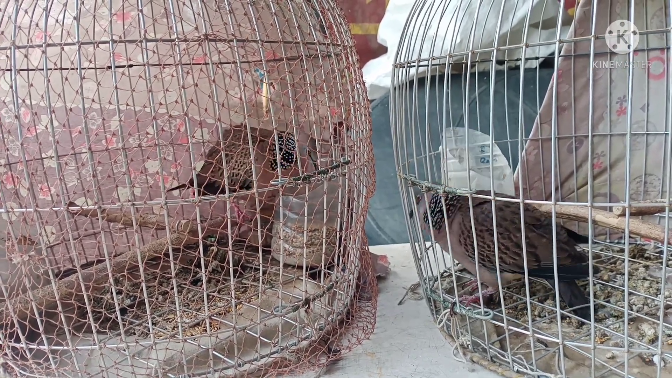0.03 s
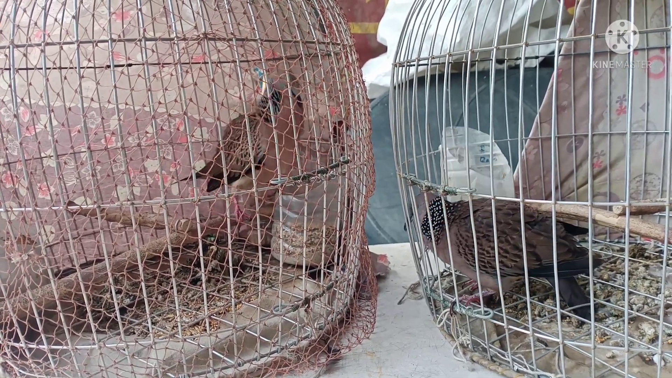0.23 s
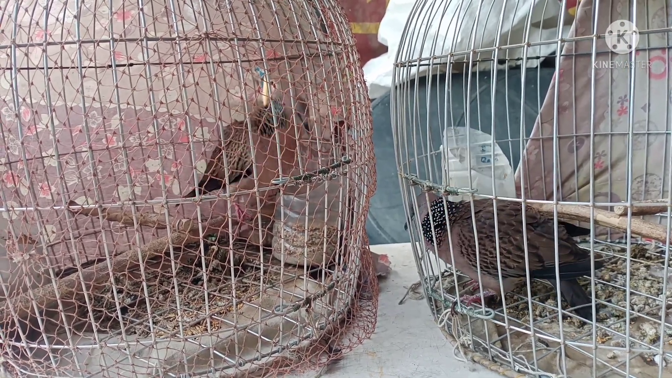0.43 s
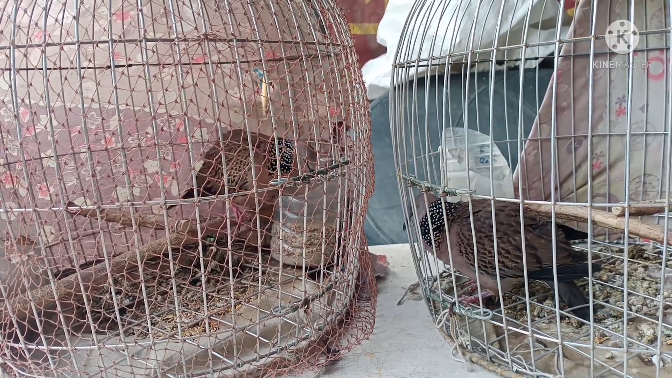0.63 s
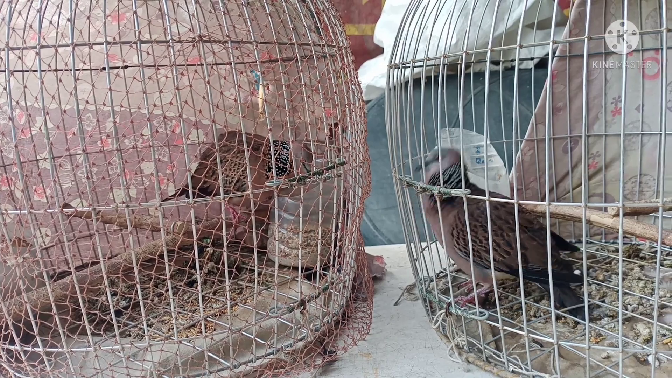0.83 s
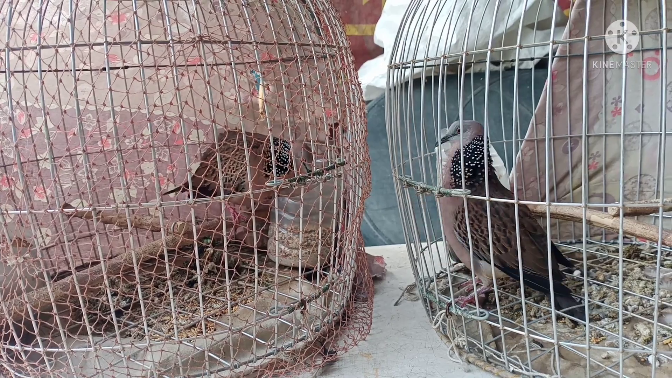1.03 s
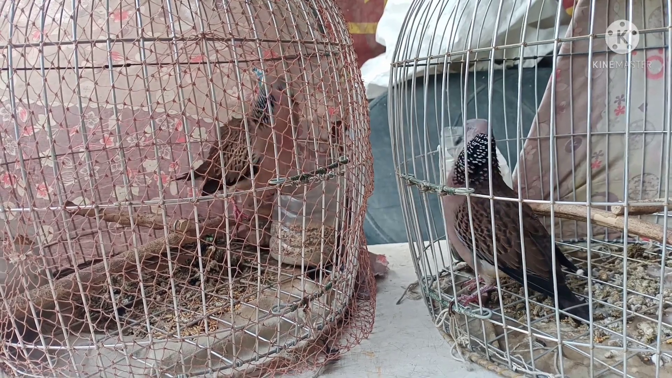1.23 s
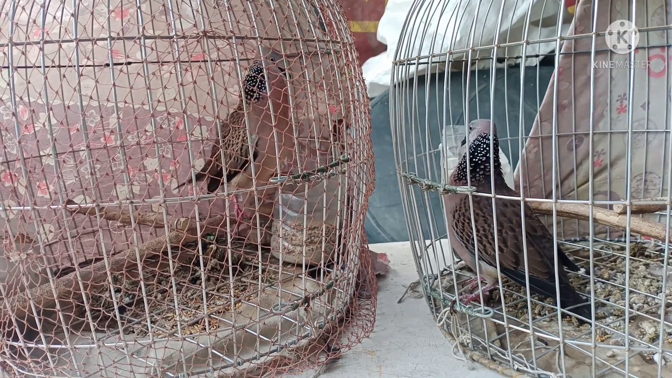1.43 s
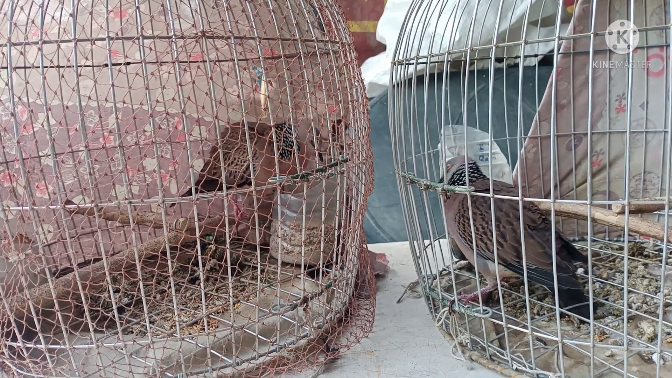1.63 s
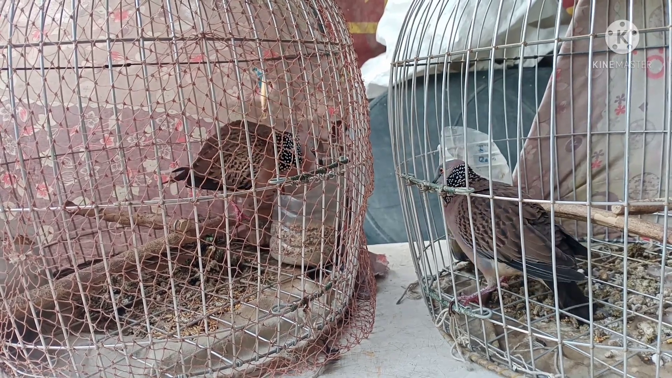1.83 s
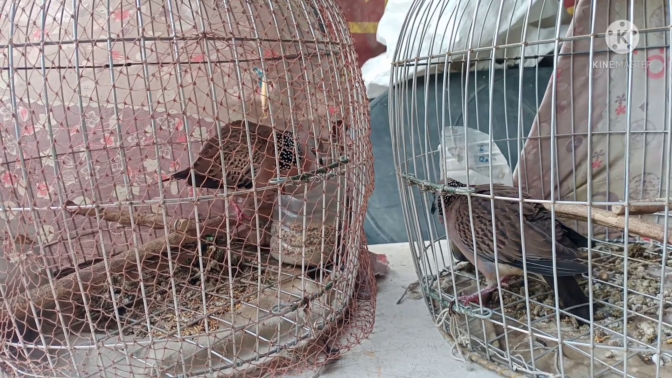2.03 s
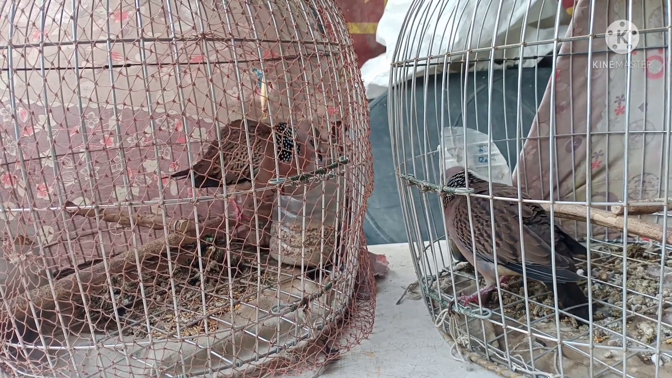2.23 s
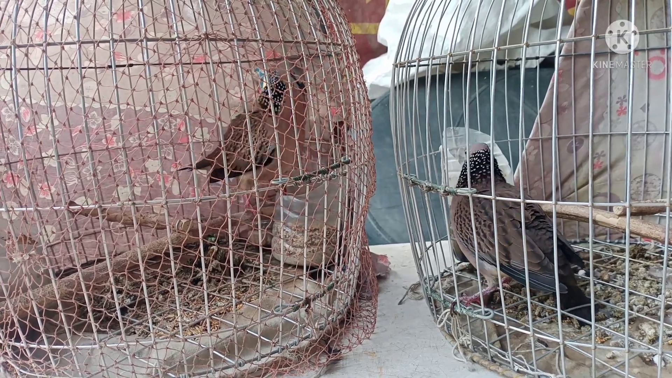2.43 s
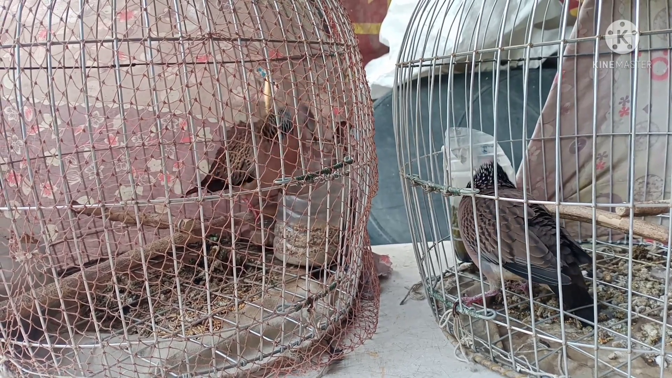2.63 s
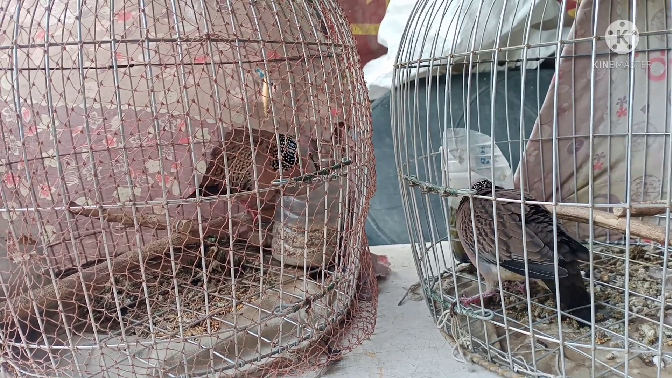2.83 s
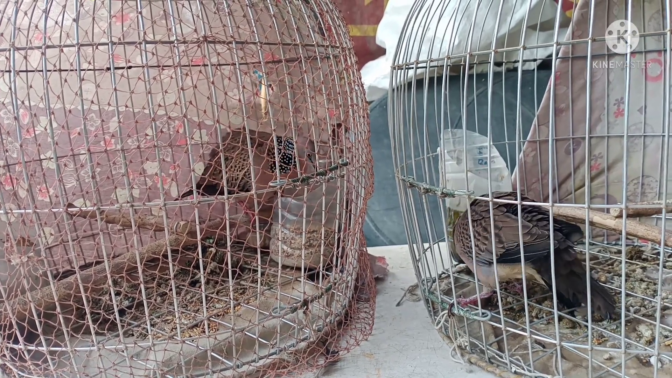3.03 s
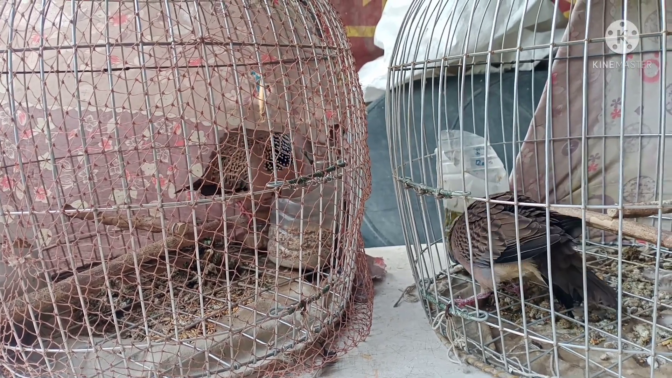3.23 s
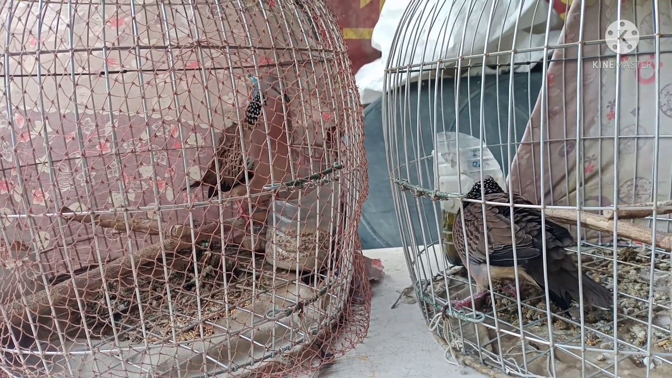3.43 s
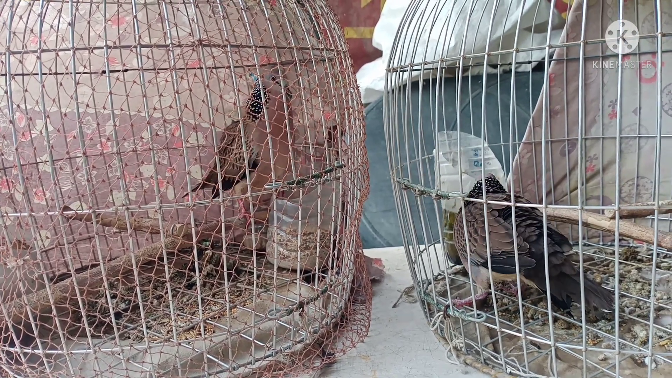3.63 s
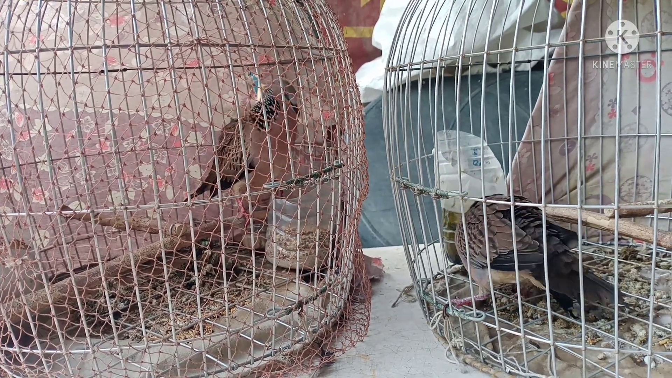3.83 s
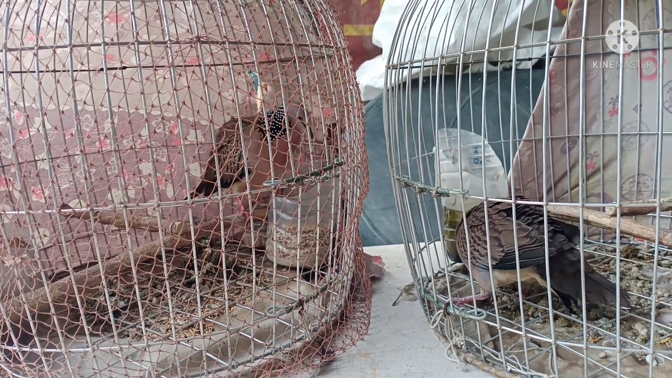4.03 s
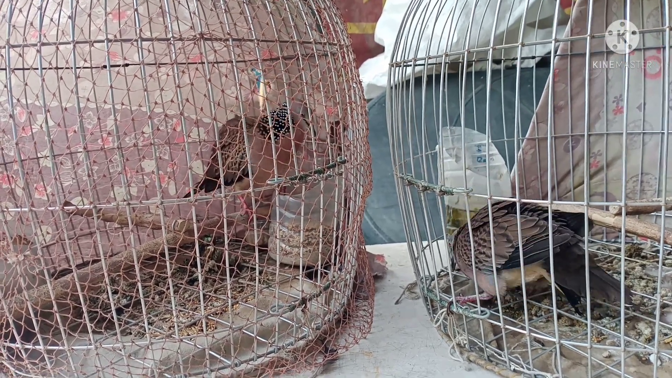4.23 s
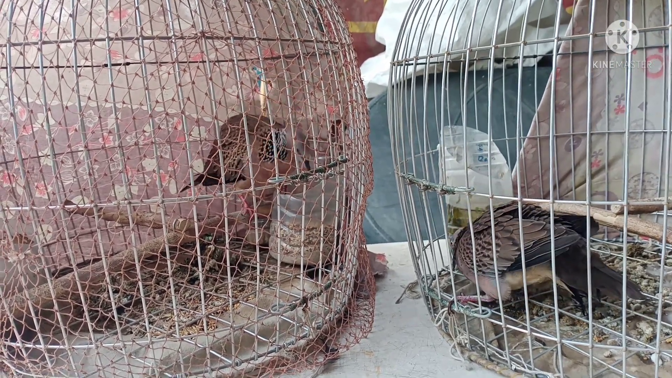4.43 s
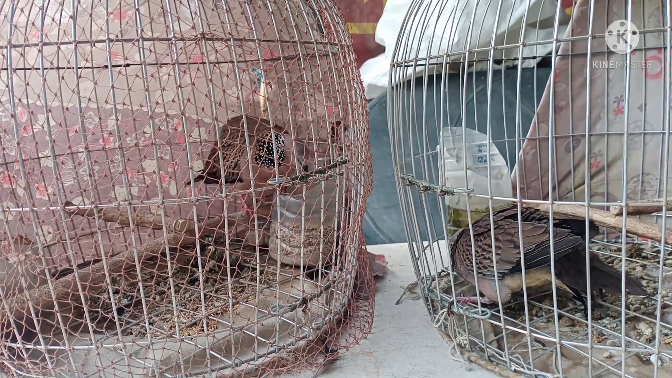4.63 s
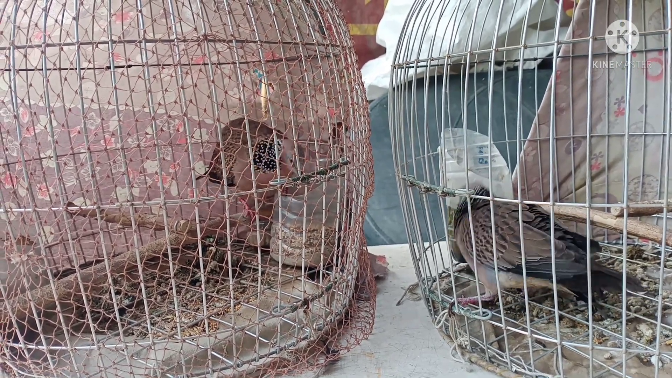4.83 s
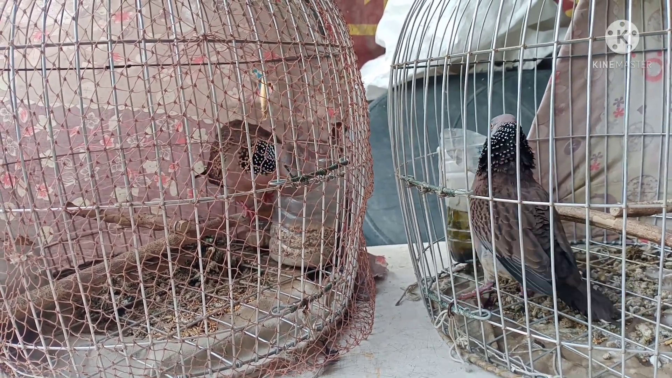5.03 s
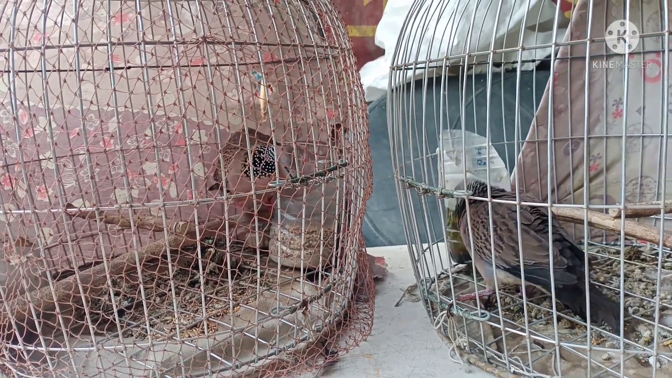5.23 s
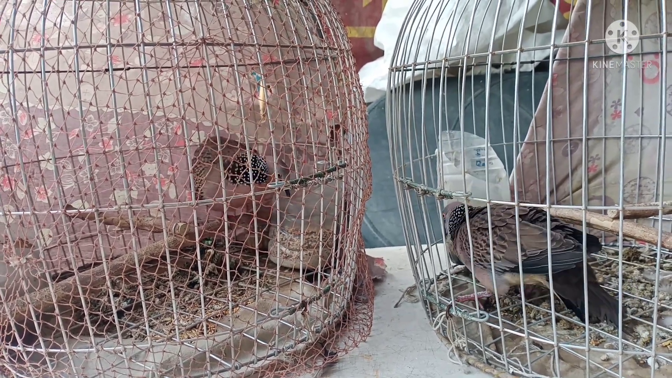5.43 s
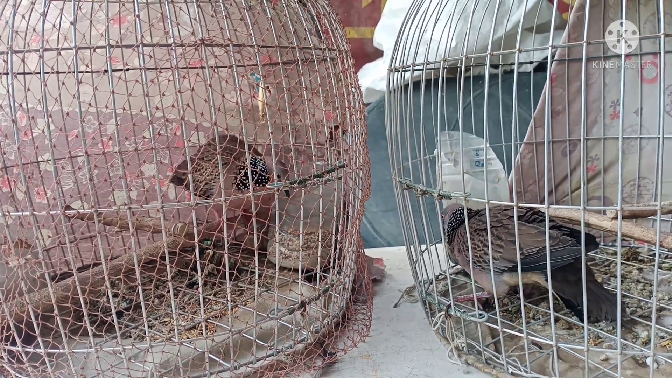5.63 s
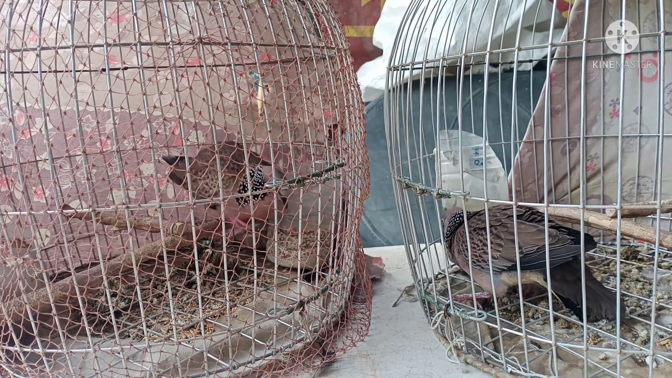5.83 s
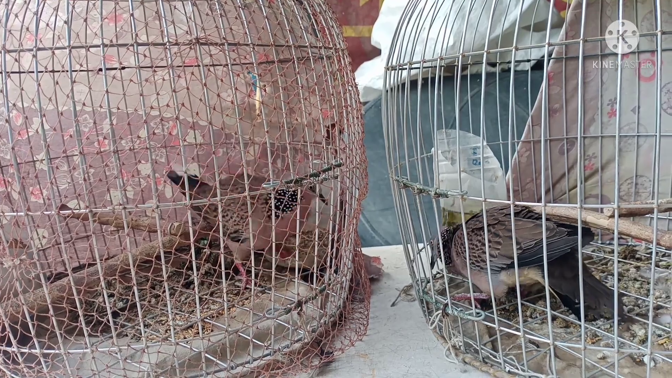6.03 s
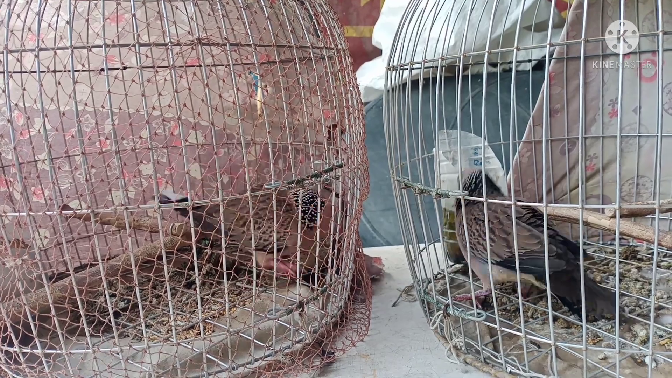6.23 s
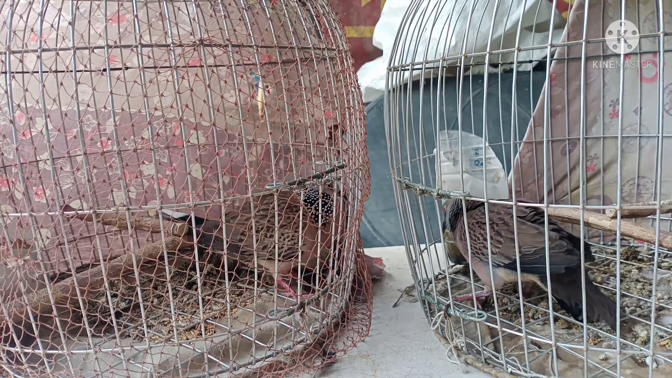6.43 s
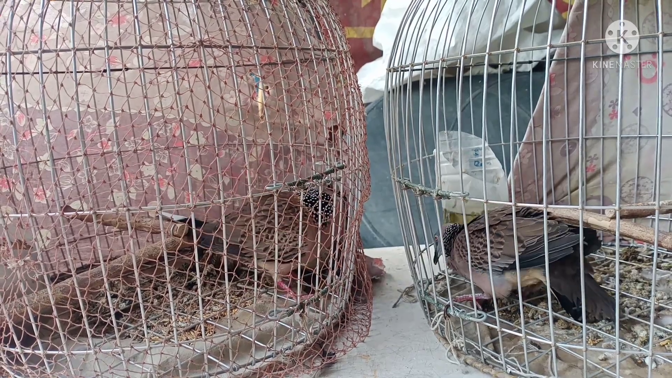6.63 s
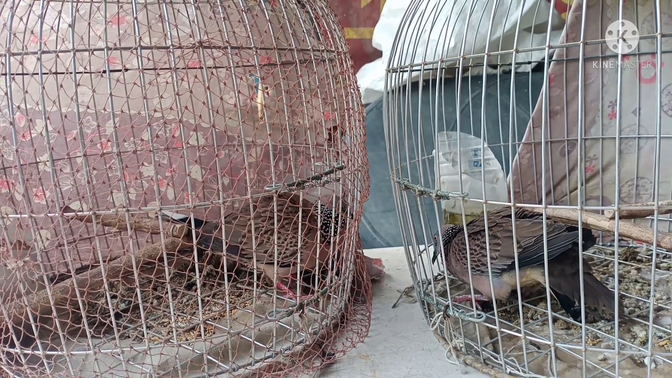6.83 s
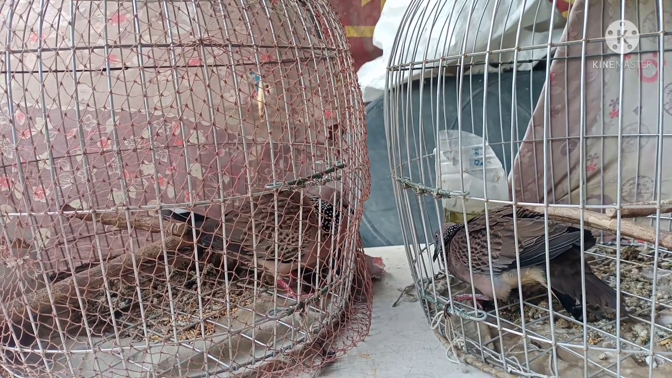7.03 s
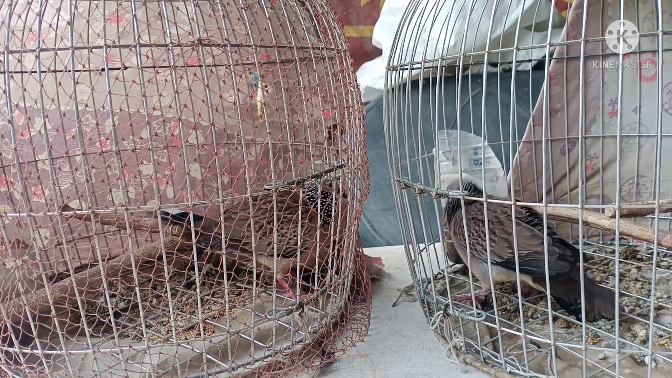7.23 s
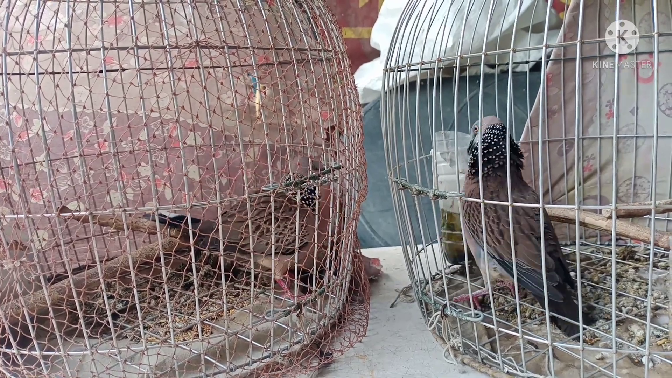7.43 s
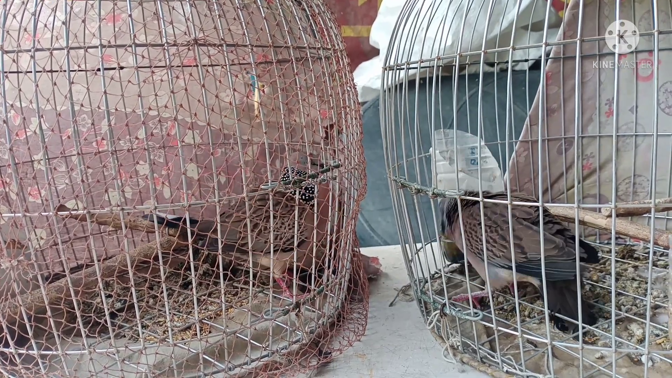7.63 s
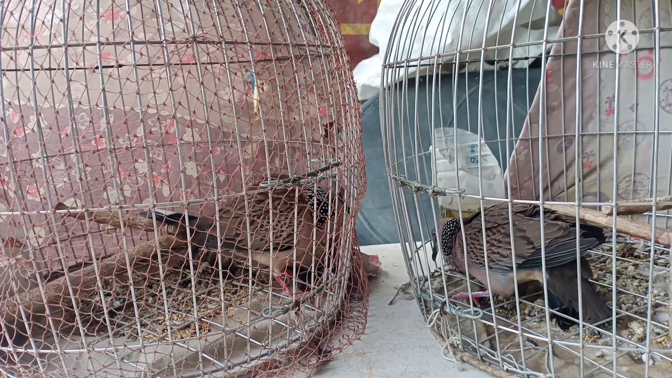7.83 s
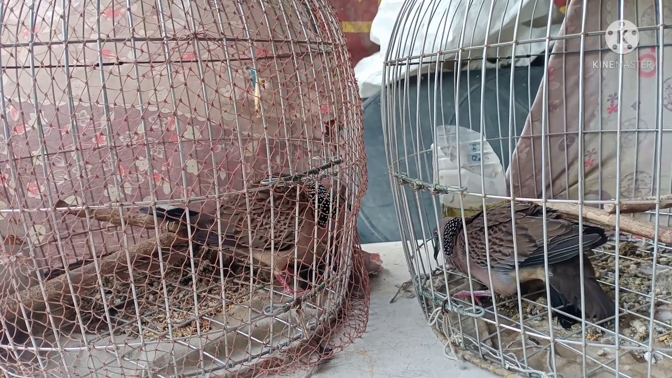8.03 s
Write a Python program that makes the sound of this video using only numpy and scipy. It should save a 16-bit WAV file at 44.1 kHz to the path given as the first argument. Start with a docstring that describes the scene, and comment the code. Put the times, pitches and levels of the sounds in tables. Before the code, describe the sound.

Close pulsing purr-coos answer a second dove's hollow two-note coos, over light cage ticks, sparse distant chirps and a quiet outdoor hush.

```python
"""Two caged spotted doves bow and coo at each other, a short note and then a long one in each phrase.
One purrs in rapid low pulses, a train of short tone bursts; the other sings two beating tones that arch
and fall, with mixing products. Feet and beaks tap the cages: noisy forces excite floor, perch and wire.
Small birds chirp further off as fluttering tones, other doves and a hoarse cry sound in the distance,
feathers brush in shaped noise, and a hard-walled porch answers over a quiet outdoor hush."""
import sys
import numpy as np
from scipy import signal
from scipy.fft import rfft, irfft, next_fast_len
from scipy.io import wavfile
from scipy.ndimage import map_coordinates

SR = 44100
rng = np.random.default_rng(int(sys.argv[2]) if len(sys.argv) > 2 else 0)


def generate_wav(signal):
    """Clip the signal to [-1, 1] and save it as 16-bit WAV at the path in sys.argv[1]."""
    frames = np.transpose(np.atleast_2d(signal))
    scaled = np.clip(frames, -1, 1) * 32767
    pcm = np.round(scaled).astype(np.int16)
    wavfile.write(sys.argv[1], SR, pcm)


N = 357210


def amp(db):
    """Level law: decibels to an amplitude ratio."""
    return 10 ** (np.asarray(db) / 20)


def unit(x):
    """Normalisation to a root-mean-square of 1."""
    return x / np.sqrt(np.mean(x ** 2) + 1e-20)


def ramp(x):
    """Linear ramp, limited to the range 0 to 1."""
    return np.clip(x, 0, 1)


def along(points, hz):
    """Interpolation of (frequency_hz, value) points on a logarithmic frequency axis."""
    point_hz, value = np.transpose(points)
    return np.interp(np.log(hz + 1), np.log(point_hz + 1), value)


def add(track, start_s, sound):
    """Superposition: mix a sound in; it may already be under way at time zero."""
    start = round(start_s * SR)
    sound = sound[max(0, -start):]
    part = track[max(0, start):][:len(sound)]
    part += sound[:len(part)]


def edges(t, length, attack, release):
    """Edge weight of a note: 1 at both ends, 0 while it is held."""
    return 1 - ramp(np.minimum(t / attack, (length - t) / release))


def wobble(rate, size):
    """Band-limited fluctuation: a smooth curve through random knots, `rate` of them a second."""
    knots = rng.standard_normal(int(size * rate / SR) + 4)
    return map_coordinates(knots, [np.arange(size) * rate / SR])


def tone(hz, rough, rate):
    """Complex tone: phase is the integral of frequency; random flutter modulates strength and phase."""
    flutter = wobble(rate, len(hz)) + 1j * wobble(rate, len(hz))
    carrier = np.exp(2j * np.pi * np.cumsum(hz) / SR)
    return carrier * (1 + rough * flutter) / np.sqrt(1 + 2 * rough ** 2)


def filtered(x, response):
    """Linear filtering: multiply the spectrum by a gain that depends on frequency."""
    size = next_fast_len(len(x) + 8192)
    return irfft(rfft(x, size) * response(np.fft.rfftfreq(size, 1 / SR)), size)[:len(x)]


def noise(spectrum):
    """Coloured noise of rms 1: white noise shaped by a spectral envelope."""
    return unit(filtered(rng.standard_normal(N), lambda hz: amp(along(spectrum, hz))))


def impulse(spectrum, size=2048):
    """Minimum-phase response of a body with this colour, energy 1, found by folding the cepstrum."""
    cepstrum = irfft(np.log(amp(along(spectrum, np.fft.rfftfreq(size, 1 / SR)))))
    cepstrum[1:size // 2] *= 2
    cepstrum[size // 2 + 1:] = 0
    response = irfft(np.exp(rfft(cepstrum)))
    return response / np.linalg.norm(response)


def note(rows, fade=0.0022):
    """Piecewise-linear contours: start time, a soft gate and one value per sample for each column."""
    s, *columns = np.transpose(rows)
    t = np.arange(s[0], s[-1], 1 / SR)
    gate = np.sin(np.pi / 2 * ramp(np.minimum(t - t[0], t[-1] - t) / fade)) ** 2
    return s[0], gate, *[np.interp(t, s, column) for column in columns]


def singing_dove(flutter=0.89, flutter_rate=170, above_db=-17, below_db=-33, octave_db=-41, sum_db=-36,
                 fall_db=-26, rasp_db=-36, whistle_db=-60, fade=0.0025):
    """Intermodulation: two tones about 100 to 130 Hz apart beat; the syrinx mixes in weak products."""
    # coos: start_s, push_s, length_s, scoop_s, top_pitch_hz, sag_by_end_of_push_hz, tone_gap_hz,
    # main_db, push_swell_db, partner_db, strain (0-1), overtones_db
    coos = [(-0.1, .135, .193, 0.055, 603.8, 22, 103.7, -14.5, -1.5, -17, .4, -9),
            (0.19, .33, 0.53, 0.096, 596.7, 43, 99.63, -18.5, 3.5, -21.5, 0.16, -4),
            (3.93, 0.098, .19, .045, 592.4, 17.5, 99.4, -15.5, -5, -27, 0.08, 6.5),
            (4.267, 0.33, .54, .062, 590.3, 14.5, 110, -16, 0, -23, .22, 2),
            (5.118, 0.13, 0.18, .065, 598.5, 19, 99.9, -18, -2, -25.5, 0.02, 1.5),
            (5.429, .372, 0.56, 0.078, 587.2, -4, 112, -17.5, 4, -22, 0.4, 0.5),
            (6.303, .11, 0.2, .075, 618, 18, 98.6, -19.5, -1, -21.5, 0.09, 0),
            (6.624, 0.37, 0.55, 0.091, 593, 63, 102, -21, 9.5, -21.5, 0.02, 0),
            (7.608, 0.13, 0.18, 0.069, 588.3, 13, 103.7, -19, 0.5, -24.5, 0.05, 0),
            (7.893, .35, .54, 0.071, 592, 22.5, 116.4, -18.5, 5.5, -24, 0.4, 0.5)]
    out = np.zeros(N)
    for s, push, length, *shape, throat_db in coos:
        t = np.arange(int(length * SR)) / SR
        hz, gap_hz, main_db, partner_db, rough = coo_shape(t, push, length, *shape)
        high = voice_break(s + t)
        main_hz = hz + high * gap_hz
        main = amp(main_db) * tone(main_hz, flutter * rough, flutter_rate)

        # the partner lies a gap above the main tone, or a gap below it while the voice is broken
        beside = lambda step_hz: tone(main_hz + step_hz, 3.2 * flutter * rough, flutter_rate)
        broken_partner_db = -6.5
        partner_mix = (1 - high) * beside(gap_hz) + high * amp(broken_partner_db) * beside(-gap_hz)
        partner = amp(partner_db) * partner_mix

        # each mixing product wavers on its own and leaves the throat at its own phase
        def product(pitch_hz, waver):
            return tone(pitch_hz, waver, flutter_rate) * np.exp(2j * np.pi * rng.random())

        weaker = amp(np.minimum(main_db, partner_db))
        low_voice = (1 - high) * amp(main_db)
        sidebands = amp(above_db) * weaker * product(hz + 2 * gap_hz, 0.54)
        sidebands += amp(below_db) * low_voice * product(hz - gap_hz, 0.97)
        # as the pitch sinks the throat lets the octave stand out against the main tone
        octave_level_db = main_db + np.interp(main_hz, [540, 585], [fall_db, octave_db])
        octave = amp(octave_level_db) * product(2 * main_hz, 0.29)
        overtones = amp(octave_db + partner_db) * product(2 * (hz + gap_hz), 0.49)
        overtones += amp(sum_db) * (1 - high) * weaker * product(2 * hz + gap_hz, 0.34)
        rasp = product(2 * hz - gap_hz, 0.31) + 1.3 * product(2 * (hz - gap_hz), 0.8)
        rasp = amp(rasp_db) * low_voice * rasp
        # a thin whistle rides far above the higher of the two tones
        whistle_level = amp(whistle_db) * (amp(partner_db) + high * amp(main_db))
        whistle = whistle_level * product(10 * (hz + gap_hz), .5)

        voice = main + partner + sidebands + amp(throat_db) * (octave + overtones + rasp) + whistle
        add(out, s, np.sqrt(2) * (1 - edges(t, length, fade, fade)) * voice.real)
    return out


def coo_shape(t, push, length, scoop_s, top_hz, sag_hz, gap_hz, db, swell_db, partner_db, strain):
    """Pressure-driven contours of one note: scoop up from rest, push, relax; strain peaks late in the push."""
    rest_hz, sink_hz, scoop_bend, sag_bend = 474.9, 489.3, 1.35, 1.8
    gap_widens_hz_per_s, partner_fade_db_per_s = 35, 25
    attack_s, release_share, edge_db, scoop_db = .027, 0.12, -24.5, -8.5  # share of the note's length
    relax_s, relaxed_db = 0.052, -22.5
    calm_rough, edge_rough, strain_lead_s, strain_width_s = 0.1, 0.11, .045, 0.064

    scoop = (1 - ramp(t / scoop_s)) ** scoop_bend
    edge = edges(t, length, attack_s, release_share * length)
    held_hz = top_hz + (rest_hz - top_hz) * scoop - sag_hz * ramp(t / push) ** sag_bend
    hz = held_hz + (sink_hz - held_hz) * ramp((t - push) / (length - push))
    pushed_db = db + swell_db * ramp(t / push) + scoop_db * scoop
    main_db = pushed_db + (relaxed_db - pushed_db) * ramp((t - push) / relax_s)
    second_db = partner_db - partner_fade_db_per_s * t
    straining = strain * np.exp(-((t - push + strain_lead_s) / strain_width_s) ** 2)
    rough = calm_rough + edge_rough * edge + straining
    wide_gap_hz = gap_hz + gap_widens_hz_per_s * t
    return hz, wide_gap_hz, main_db + edge_db * edge, second_db + edge_db * edge, rough


def voice_break(s):
    """Register change: 1 while the main tone sits one gap higher, else 0, with smooth transitions."""
    # in two long notes the voice leaps up and later slides back: leap_s, slide_s
    breaks = [(.303, .46), (6.713, 7.008)]
    leap_width_s, slide_width_s = 0.01, 0.024
    return sum(np.tanh((s - leap) / leap_width_s) - np.tanh((s - slide) / slide_width_s)
               for leap, slide in breaks) / 2


def purring_doves(pulse_hz=103, width=0.0023, jitter=.0007, size_db=1.5, pitch_spread=.025, slip=1.26,
                  octave_db=-52):
    """Pulse-train excitation: each syrinx opening emits a few coo cycles, early or late and out of step."""
    # notes, the first a faint purr from a dove further off, the others from the near purring dove:
    # start_s, length_s, top_pitch_hz, closing_pitch_hz, level_db, swell_db
    purrs = [(-.04, .29, 696, 693, -33, 0), (0.409, 0.16, 658, 574, -21, 1.5),
             (0.653, 0.41, 642.4, 630, -22, 5), (1.516, .17, 670, 557, -22, 3.5),
             (1.781, 0.4, 646.6, 640, -21, 4.5), (2.579, 0.15, 681, 569, -21.5, 4.5),
             (2.833, 0.4, 640.5, 607, -22, 5)]
    out = np.zeros(N)
    t = np.arange(-SR // 80, SR // 80) / SR
    swell = np.exp(-.5 * (t / width) ** 2)
    swell /= np.sqrt(np.sum(swell ** 2) / SR * pulse_hz / 2)
    for s, length, *shape in purrs:
        times = np.arange(width, length, 1 / pulse_hz)
        chance = rng.standard_normal((64, 4))  # one row per pulse
        pitches, levels = purr_shape(times, length, *shape)
        for at, hz, db, (late, size, sharp, turn) in zip(s + times, pitches, levels, chance):
            start_phase = 2 * np.pi * 20 * at + slip * turn  # the coo is not locked to the pulse rate
            phase = 2 * np.pi * hz * (1 + pitch_spread * sharp) * t + start_phase
            pulse = swell * np.cos(phase) + amp(octave_db) * swell ** 2 * np.cos(2 * phase)
            add(out, at + jitter * late + t[0], amp(db + size_db * size) * pulse)
    return out


def purr_shape(t, length, top_hz, end_hz, db, swell_db):
    """Pitch and level contours: a purr scoops up, swells in level and glides to its closing pitch."""
    start_hz, scoop_s, sink_s = 574, 0.08, 0.075
    attack_s, release_s, edge_db = 0.029, 0.027, -17.5
    scoop_hz = (start_hz - top_hz) * ramp(1 - t / scoop_s)
    sink_hz = (end_hz - top_hz) * ramp(1 - (length - t) / sink_s)
    level_db = db + swell_db * t / length + edge_db * edges(t, length, attack_s, release_s)
    return top_hz + scoop_hz + sink_hz, level_db


def wall_bounce(x, delay=.0135, bounce_db=-12):
    """Single reflection: the wall behind the cage returns each pulse between the following ones."""
    bounce = np.pad(x, (int(delay * SR), 0))[:N]
    return (x + amp(bounce_db) * bounce) / np.sqrt(1 + amp(bounce_db) ** 2)


def cage_taps(strike=4, blow_t60=0.025, scuff_t60=0.25, scuff_rise=0.0012, grit_db=3.0,
              ring_width_hz=420, ring_db=-6, thud_db=-4, knock_db=-18, wire_db=-7):
    """Source-filter impact: a sharp blow and a grainy rattle of grit excite floor, perch and bars."""
    # taps and scuffs, levels ahead of the offsets above:
    # start_s, perch_knock_db, floor_thud_db, wire_tick_db, ring_hz, share of the energy in the first blow (0-1)
    taps = [(0.617, -38, -60.5, -61.5, 3500, 0), (0.9343, -29, -47.5, -53.5, 3040, 0.2),
            (1.1528, -31.5, -48.5, -48.5, 1990, 0.4), (1.3984, -48, -54.5, -47.5, 1980, 0.4),
            (1.4177, -45.5, -58, -47, 3250, 0.8), (1.4414, -39.5, -56.5, -45.5, 1980, 0.7),
            (1.7205, -29.5, -42, -50, 3650, 0.45), (2.143, -30, -51.5, -48.5, 2440, 0),
            (2.3735, -16, -32, -42, 1970, 0.3), (2.4964, -41.5, -60.5, -49.5, 2930, 0.7),
            (2.7462, -35, -51.5, -62.5, 2100, 0.6), (3.0355, -20, -42.5, -43, 3500, 0.45),
            (3.3862, -30, -48, -48, 2900, 0.6), (3.5254, -39.5, -59, -43.5, 3740, 0.45),
            (3.5434, -38.5, -65, -40, 3020, 0.6), (3.6401, -22, -37.5, -41, 1990, 0.45),
            (3.9255, -42.5, -59, -57.5, 2920, 0.45), (4.0861, -22.5, -40, -34.5, 1860, 0.45),
            (4.2762, -30, -52, -43, 2640, 0.45), (4.6194, -40, -51, -54.5, 2290, 0.45),
            (4.8653, -26.5, -47.5, -42.5, 2600, 0.3), (4.9237, -32.5, -61.5, -39.5, 4120, 0.5),
            (5.3078, -32, -60.5, -45, 3640, 0.7), (5.457, -36, -54.5, -46.5, 1850, 0.7),
            (6.0342, -40.5, -60, -53, 3090, 0.3), (7.0155, -42.5, -54, -46.5, 2150, 0.45),
            (7.1407, -28.5, -62.5, -26.5, 2930, 0.6), (7.2204, -38, -56, -42.5, 3550, 0.45)]
    # spectral colours of cage floor, perch and wire bars: frequency_hz, gain_db
    floor_colour = [(60, -20.5), (170, -6), (300, 1), (450, -1.5), (750, -4), (1100, -17.5), (2000, -44)]
    perch_colour = [(400, -27), (900, 3.5), (1400, -1), (2400, -3), (3700, -2.5), (4700, -21),
                    (7000, -40.5)]
    wire_colour = [(2500, -30.5), (4500, -10), (6000, -7), (7600, 5.5), (9000, -1.5), (11500, -14),
                   (15500, -14)]

    t = np.arange(SR // 3) / SR
    thud, knock, wire = impulse(floor_colour), impulse(perch_colour), impulse(wire_colour)
    short = t[:len(knock)]
    out = np.zeros(N)
    for s, perch_db, floor_db, tick_db, ring_hz, sharp in [*taps, *grit_ticks()]:
        share = ramp(sharp)
        grain = amp(-60 * t / scuff_t60 + grit_db * wobble(400, len(t)))
        rattle = rng.standard_normal(len(t)) * grain * (1 - np.exp(-t / scuff_rise))
        blow = rng.standard_normal(len(t)) * amp(-60 * t / blow_t60)
        blow[0] = strike  # first contact, then a brief chatter
        force = np.sqrt(1 - share) * rattle / np.linalg.norm(rattle)
        force += np.sqrt(share) * blow / np.linalg.norm(blow)
        # a short ring at a varied pitch colours each tap
        ring = np.sin(2 * np.pi * ring_hz * short) * np.exp(-np.pi * ring_width_hz * short)
        perch = knock + amp(ring_db) * ring / np.linalg.norm(ring)
        body = amp(floor_db + thud_db) * thud + amp(perch_db + knock_db) * perch
        body += amp(tick_db + wire_db) * wire
        add(out, s, np.sqrt(0.033 * SR) * signal.fftconvolve(force, body))  # energy spread over 33 ms
    return out


def grit_ticks(count=12):
    """Random point process: rows like those of the taps, for faint seed and grit ticks."""
    knock_db, thud_db, wire_db, ring_hz, share = -54, -71, -62.5, 3303.5, 0.34
    spread_db = 1.5
    moments = rng.random(count) * N / SR
    sizes = spread_db * rng.standard_normal(count)
    return [(s, knock_db + db, thud_db + db, wire_db + db, ring_hz, share) for s, db in zip(moments, sizes)]


def feathers(grain_db=2.5):
    """Friction noise: feathers brush in soft, grainy swishes that swell and fade as the doves bow."""
    # brushes: start_s, length_s, level_db
    brushes = [(2.035, 0.097, -54), (5.33, 0.075, -51), (5.41, 0.12, -54), (4.914, .07, -56.5),
               (5.844, .06, -58), (6.361, 0.08, -53.5), (6.605, 0.13, -58.5), (6.765, 0.05, -57.5),
               (7.541, 0.052, -58), (7.661, .06, -58.5)]
    # colour of the brushing noise: frequency_hz, gain_db
    feather_colour = [(1200, -19.5), (2500, -1), (3800, 1.5), (5500, -11.5), (8500, -10.5), (12000, -27.5)]
    stroke = np.zeros(N)
    for s, length, db in brushes:
        add(stroke, s, amp(db) * np.sin(np.linspace(0, np.pi, int(length * SR))))
    return stroke * amp(grain_db * wobble(230, N)) * noise(feather_colour)


def far_doves(rough=0.33, rate=110, swell_power=1.4, arch_hz=21.8):
    """Frequency and amplitude modulation: single wavering lines swell, arch in pitch and fade."""
    # doves further off: start_s, length_s, start_pitch_hz, end_pitch_hz, level_db
    far_coos = [(4.12, 0.21, 815, 827, -56.5), (5.05, 0.075, 573, 600, -40.5),
                (5.345, .15, 624, 688, -28.5), (5.622, 0.31, 687, 765, -34.5)]
    out = np.zeros(N)
    for s, length, start_hz, end_hz, db in far_coos:
        u = np.linspace(0, 1, int(length * SR))
        arch = np.abs(np.sin(np.pi * u))
        hz = start_hz + (end_hz - start_hz) * u + arch_hz * arch
        add(out, s, np.sqrt(2) * amp(db) * arch ** swell_power * tone(hz, rough, rate).real)
    return out


def small_birds(rough=2.8, rasp_rate=480, waver=0.011, squeal_rough=.9, trail_s=.13, trail_db=-12,
                trail_rough=.3):
    """Random modulation makes gliding chirps husky, each with a thin trail; harmonics make one squeal."""
    # chirps: start_s, length_s, start_pitch_hz, end_pitch_hz, level_db
    chirps = [(1.167, 0.032, 2140, 2190, -52.5), (1.917, 0.059, 2180, 2710, -48),
              (2.298, 0.059, 2180, 2580, -46), (4.161, 0.064, 2560, 2810, -47),
              (4.654, 0.072, 2400, 2600, -46), (6.026, 0.032, 3050, 2990, -50.5)]
    # contour of the squeal, which rises and then falls: time_s, pitch_hz, level_db ahead of its colour
    squeal = [(5.57, 1054, -67.5), (5.595, 1104, -63), (5.625, 1172, -53.5), (5.655, 1060, -50),
              (5.68, 865, -47), (5.71, 831, -55.5), (5.735, 863, -61)]
    # strength of the squeal's harmonics: frequency_hz, gain_db
    squeal_colour = [(1000, -32), (1750, 2.5), (2350, 6), (2600, -16.5), (3400, 4), (4200, -11),
                     (5100, 0.5), (6000, -7), (8300, -6), (10000, -30.5)]

    out = np.zeros(N)
    for s, length, start_hz, end_hz, db in chirps:
        u = np.linspace(0, 1, int(length * SR))
        swell = np.abs(np.sin(np.pi * u)) ** 0.48
        glide_hz = start_hz + (end_hz - start_hz) * u
        add(out, s, amp(db + 3) * swell * tone(glide_hz, rough, rasp_rate).real)
        v = np.linspace(0, 1, int(trail_s * SR))
        trail_swell = np.sqrt(np.abs(np.sin(np.pi * v))) * (1 - v)
        trail = trail_swell * tone(np.full(len(v), end_hz), trail_rough, rasp_rate).real
        add(out, s + .8 * length, amp(db + trail_db) * trail)

    s, gate, hz, db = note(squeal)
    hz = hz * (1 + waver * wobble(120, len(hz)))
    harmonics = sum(amp(along(squeal_colour, k * hz)) * tone(k * hz, squeal_rough, 420).real
                    for k in range(1, 10))
    add(out, s, gate * amp(db - 1.5) * harmonics)
    return out


def far_call(rough=2, rate=230, upper_db=-6, upper_ratio=1.6):
    """Line broadening: strong flutter blurs a hoarse, distant cry and a second smear above it."""
    # contour of the cry: time_s, pitch_hz, level_db
    cry = [(3.25, 1144, -64.5), (3.42, 1234, -56), (3.52, 1333, -55.5), (3.66, 1326, -57.5),
           (3.74, 1285, -66)]
    s, gate, hz, db = note(cry)
    smear = amp(upper_db) * tone(upper_ratio * hz, 2 * rough, 4 * rate)
    out = np.zeros(N)
    add(out, s, np.sqrt(2) * gate * amp(db) * (tone(hz, rough, rate) + smear).real)
    return out


def porch(x, delay=.006):
    """Reverberation: the walls answer with a noise tail in which each frequency dies at its own speed."""
    # decay time of the porch: frequency_hz, t60_s
    decay = [(150, 0.28), (650, 0.17), (2500, 0.14), (8000, 0.033), (15000, 0.022)]
    hz, t, grid = signal.stft(rng.standard_normal(SR // 2), SR, nperseg=256)
    fading = grid * amp(-60 * t / along(decay, hz)[:, None])
    tail = signal.istft(fading, SR, nperseg=256)[1]
    return signal.fftconvolve(np.pad(x, (int(delay * SR), 0)), tail / np.linalg.norm(tail))[:N]


def background(rumble_db=-56.5, rustle_db=-61.5, hiss_db=-72, wander_db=0.42, wander_rate=2.5):
    """Coloured noise: a slowly wandering outdoor rumble and rustle, and a steady thin high hiss."""
    # spectral densities, relative: frequency_hz, density_db
    hush_colour = [(25, -35), (48, -11), (98, -2), (125, -6), (320, -12), (600, -15.5), (1150, -17.5),
                   (2000, -21.5), (3600, -22.5), (4700, -34), (6200, -32.5), (8400, -29.5), (11300, -41),
                   (15000, -39)]
    hiss_colour = [(4500, -28), (6500, -9.5), (7800, 0.5), (8800, -4), (10500, -28.5)]
    hush = noise(hush_colour)
    low = filtered(hush, lambda hz: 1 / (1 + (hz / 700) ** 4))
    wander = lambda db: amp(db + wander_db * wobble(wander_rate, N))
    rumble = wander(rumble_db) * unit(low)
    rustle = wander(rustle_db) * unit(hush - low)
    return rumble + rustle + amp(hiss_db) * noise(hiss_colour)


def scene():
    """Direct-to-reverberant balance: near doves and cages almost dry, small birds with more porch."""
    doves = singing_dove() + wall_bounce(purring_doves())
    others = far_doves()
    birds = small_birds() + far_call()
    cages = cage_taps() + feathers()
    echo = porch(amp(-16.5) * doves + amp(-12.0) * others + amp(-3.5) * birds + amp(-16.5) * cages)
    return (doves + others + birds + cages + echo + background())[None]


def record(dry):
    """Band limiting: an ideal low-pass keeps nothing at or above its limit."""
    top_hz = 15900
    return filtered(dry[0], lambda hz: hz < top_hz)[None]


dry = scene()
out = record(dry)
generate_wav(out)
```